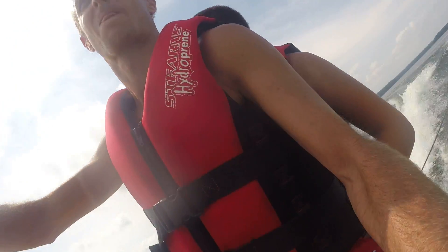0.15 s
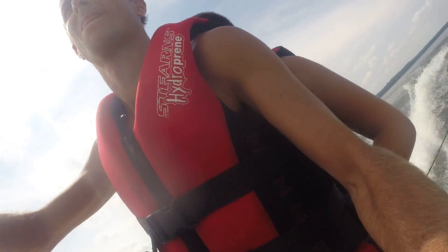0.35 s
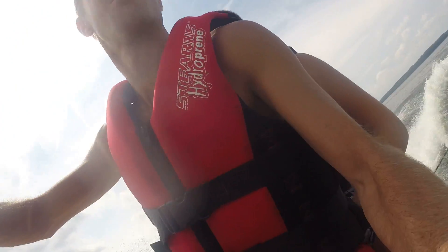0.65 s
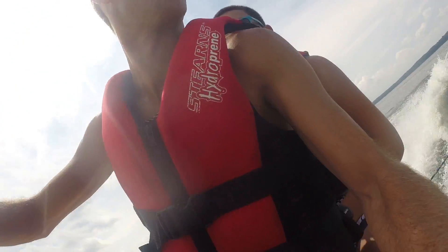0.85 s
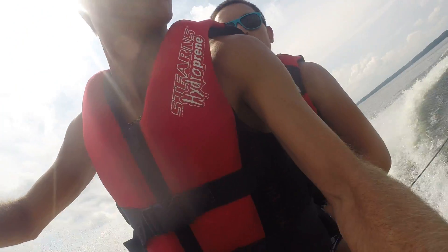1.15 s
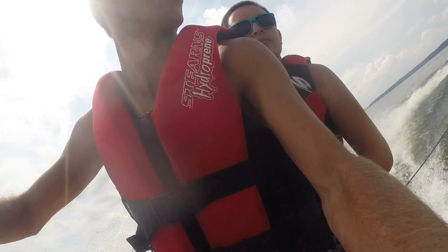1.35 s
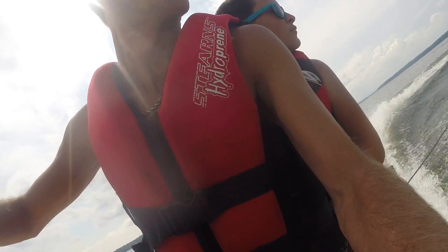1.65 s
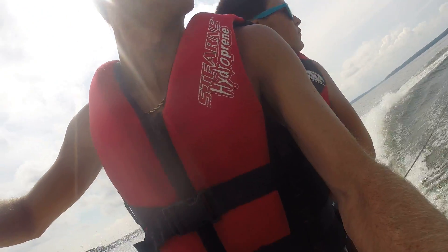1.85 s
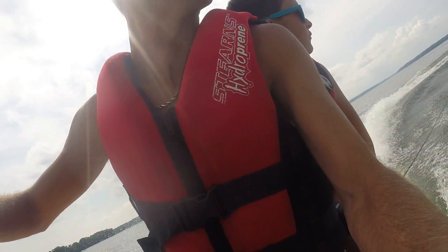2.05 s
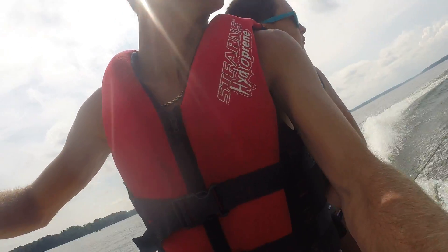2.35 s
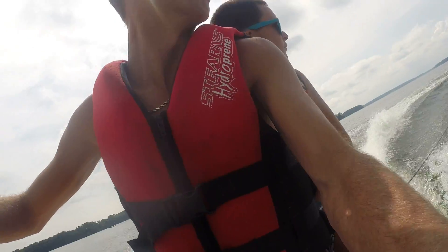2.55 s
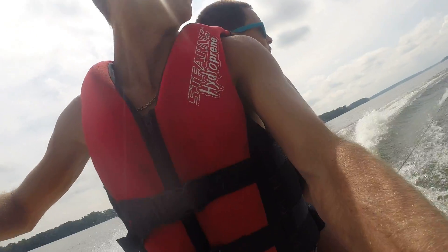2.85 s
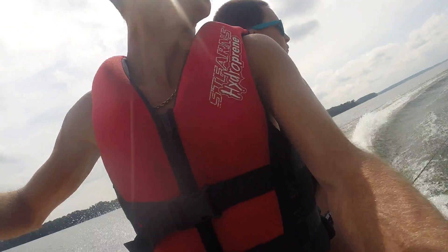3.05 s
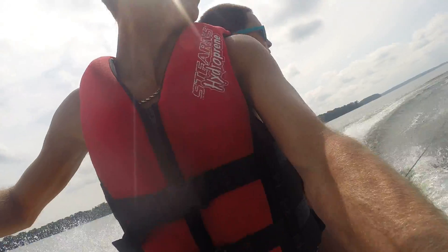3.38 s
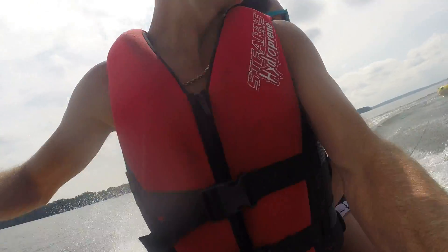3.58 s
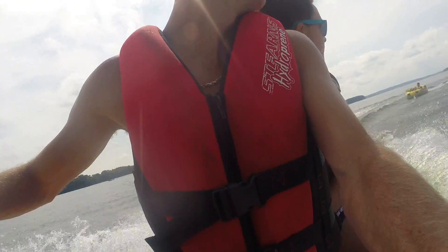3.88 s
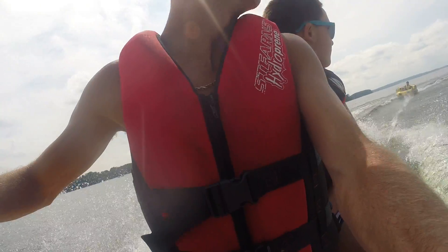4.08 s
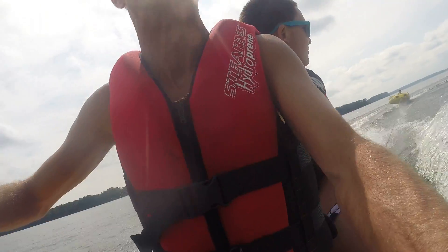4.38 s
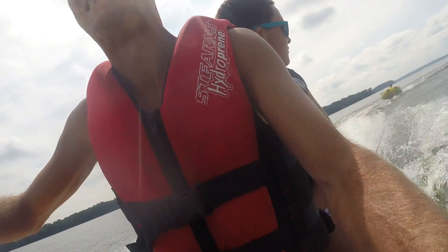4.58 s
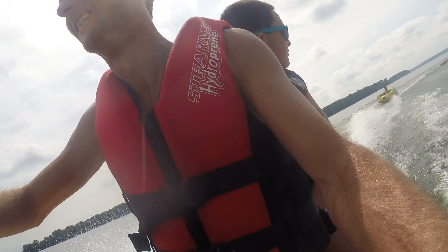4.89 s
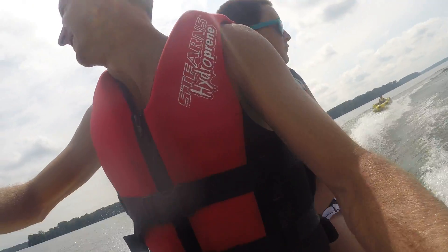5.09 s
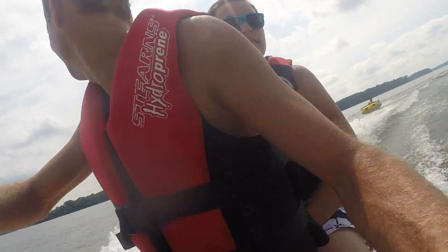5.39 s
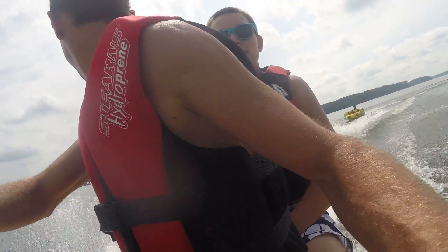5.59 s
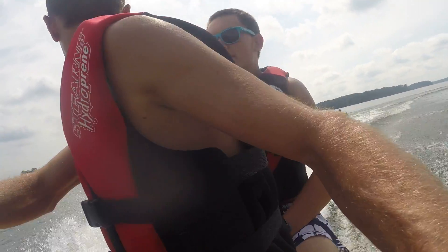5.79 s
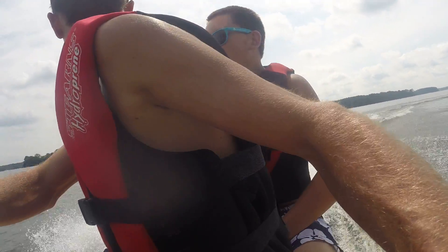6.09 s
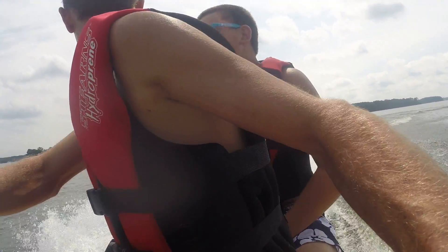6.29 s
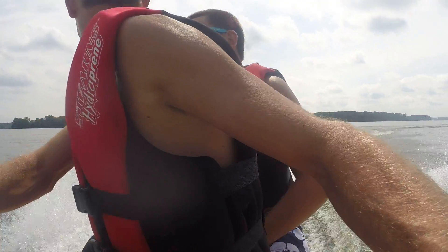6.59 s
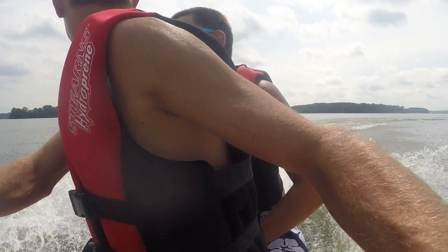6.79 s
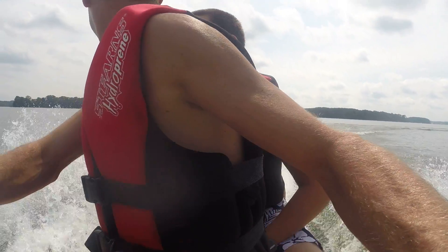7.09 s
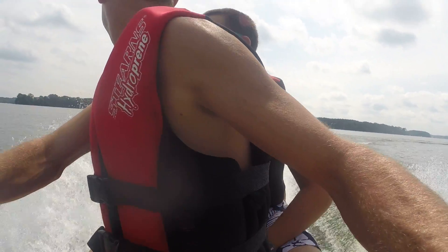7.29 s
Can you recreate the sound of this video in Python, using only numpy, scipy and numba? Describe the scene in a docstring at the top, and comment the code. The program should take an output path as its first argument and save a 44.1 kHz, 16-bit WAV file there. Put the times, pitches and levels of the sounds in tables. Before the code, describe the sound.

Muffled, boxy engine growl from a fast personal watercraft, very close and dry, with no echo. Low hum around a hundred-odd hertz carries throughout, its pitch easing up early and then settling lower. Over it come short rough bouts of hollow plastic rattling, a heavy low thump before one second, small clicks and knocks, the busiest near six and a half seconds, and very quiet hiss of spray.

```python
"""A hard case rattle over a three-cylinder engine drone: a water scooter at speed, heard inside a small
sealed case clamped to its handlebar. Firings, crankshaft and impeller hum as multiples of the engine cycle.
Pulsed noise buzzes the case's resonances, in harder bouts as the hull slams; a few blows knock the clamp.
Low resonant noise shakes the mount, and spray is faint hiss coloured by the shell."""
import sys
import numpy as np
from scipy import signal
from scipy.fft import rfft, irfft
from scipy.io import wavfile
from scipy.ndimage import uniform_filter1d
from numba import njit

SR = 44100
rng = np.random.default_rng(int(sys.argv[2]) if len(sys.argv) > 2 else 0)


def wrap_up_sound(samples):
    """Save the sound to the file named by the first command line argument, as 16-bit audio."""
    columns = np.atleast_2d(samples).T
    # keep every value between -1 and 1, then stretch to whole-number steps
    tamed = np.clip(columns, -1, 1)
    steps = np.round(tamed * 32767).astype(np.int16)
    wavfile.write(sys.argv[1], SR, steps)


N = 328104

# Table levels are starting points or balances; the functions below add their own trims and movement.
# Spray hiss, and its top end relative to the rest: time_s, hiss_db, top_db
SPRAY_CURVE = [(0.06, -55.5, -12), (0.63, -53.5, -10), (0.77, -54.5, -11.5), (2.06, -52, -11.5),
               (2.71, -52.5, -11), (2.93, -57.5, -12.5), (3.2, -53.5, -11.5), (3.61, -55, -10.5),
               (4.22, -53.5, -12.5), (5.4, -53, -10.5), (5.89, -58.5, -11), (6.32, -55, -12),
               (7.34, -53, -14), (7.38, -53, -12)]
# Tone colour of the hiss through the shell: frequency_hz, level_db
SHELL_COLOUR = [(2200, -17.5), (2400, 5), (2700, 4), (3000, 6), (3250, -3.5), (4000, 0), (4500, -1.5),
                (5200, -1.5), (5700, -5.5), (6300, 0.5), (7600, -8.5), (8300, -8), (9200, -18.5),
                (10200, -14), (13000, -22.5), (15200, -35.5)]
# Steady shaking of the mount: time_s, level_db
SHAKE_CURVE = [(0, -22.5), (2.5, -23.5), (4.5, -25.5), (7.44, -29.5)]
# Gusts and waves that jolt the mount: peak_s, peak_db
JOLTS = [(.36, -18), (.8, -9), (1.5, -20), (2.06, -18), (2.35, -14), (2.72, -21), (3.54, -16.5),
         (4.45, -23), (5.16, -16.5), (6.5, -25.5), (6.95, -22)]
JOLT_S = 0.054  # time from the peak to 1/e of a jolt's power
# Knocks of the case against its clamp: start_s, wall_blow_db, ring_relative_to_walls_db
KNOCKS = [(.373, -27, -21), (2.712, -22.5, -11), (4.449, -26, -21), (4.477, -28, -13), (5.116, -28, -19),
          (5.331, -30, -21), (6.551, -23, -5), (6.576, -19.5, -1), (6.59, -21.5, -2), (6.627, -24, -9)]
# Wall resonances a knock excites: centre_hz, width_hz, level_db
KNOCK_WALLS = [(700, 130, -2), (1260, 120, -5)]
# Thin ring a knock excites: centre_hz, width_hz, level_db
KNOCK_RING = [(1840, 150, 2.5)]
# One droplet ticking on the shell: start_s, blow_db
DROPLET = (1.7, -30)
# Broad resonance of that tick: centre_hz, width_hz, level_db
DROPLET_RING = [(4500, 3500, 1)]
# Quiet buzz of the case all along: time_s, walls_db, lid_db, ring_db
QUIET_BUZZ = [(0, -43, -33, -40), (.5, -38.5, -32.5, -41), (1.2, -35.5, -35.5, -38), (2.2, -36, -35, -38.5),
              (2.9, -40, -37.5, -43.5), (3.85, -40, -38, -41.5), (4.3, -36.5, -34.5, -36),
              (4.6, -38, -37.5, -43.5), (5.3, -38.5, -37, -43.5), (5.85, -38, -39, -45.5),
              (5.9, -40.5, -40.5, -47), (6.4, -37.5, -37.5, -43.5), (6.85, -36.5, -35, -42),
              (7.44, -33, -33, -38.5)]
# Bouts of hard rattling against the clamp as the hull slams:
# start_s, length_s, walls_db, lid_db, ring_db, extra_hum_db (before HUM_LIFT), extra_fourth_order_db
BOUTS = [(0.0, .33, -29, -39.5, -51, 3.5, 4), (0.519, 0.15, -32, -35, -38, -2.5, 4.5),
         (0.649, 0.51, -28.5, -35, -42.5, 1.5, 3), (1.646, 0.13, -30, -45, -50, 4, -1),
         (2.328, .17, -32, -44, -42, 2, 3), (2.708, 0.19, -32, -35.5, -44.5, 4.5, 9),
         (3.25, .1, -34, -39, -40.5, 1, 1), (3.44, .11, -38, -38, -49, 5.5, 0),
         (3.669, .15, -34, -38.5, -52, 10.5, 10), (4.36, .19, -28, -36, -42.5, 5, 8.5),
         (4.741, 0.069, -39, -42, -51, -1, 2), (5.079, .2, -38, -42, -48, 1, 3),
         (5.496, .37, -34.5, -38, -47.5, 4.5, 10), (6.439, .165, -33, -37.5, -44, 4, 13.5),
         (6.52, .085, -30, -35, -42, 0.5, 4), (6.626, 0.14, -34, -43.5, -47, 1.5, 8)]
BOUT_ATTACK_S, BOUT_RELEASE_S, BOUT_FLICKER_DB = 0.038, 0.02, 2
# Share of extra_hum_db taken by the first four strong multiples: firing, second_order, fifth, blades
HUM_LIFT = (0.074, 0.83, 0.86, 0.068)
# Low wall resonances of the case: centre_hz, width_hz, level_db
WALL_MODES = [(307.3, 61, 10), (500, 280, -6), (678, 88, 2)]
# Lid resonances: centre_hz, width_hz, level_db
LID_MODES = [(897.5, 107, 1), (1068, 138, -1), (1238, 147, -2.5), (1510, 350, -12.5)]
# Thin ring resonances: centre_hz, width_hz, level_db
RING_MODES = [(1845, 73, 0.5), (1752, 100, -5.5), (1990, 120, -5.5), (2203, 140, -8.5)]
# Rattle that repeats each cycle: cycle_multiple, level_relative_to_walls_db
REPEATING_RATTLE = [(11, -17.5), (12, -11.5), (13, -13), (14, -14), (15, -13.5), (16, -13.5), (17, -10.5),
                    (18, -11.5), (19, -18)]
REPEAT_GROWTH = 0.15  # extra dB of repeating rattle per dB the walls' buzz rises over its mean
# Engine hum through the mount between bouts; one cycle is two shaft turns:
# time_s, cycle_hz, firing_db, second_shaft_order_db, fifth_multiple_db, impeller_blades_db, fourth_shaft_order_db
HUM_CURVE = [(0, 39.9, -15, -26.5, -23, -18, -29), (.41, 38.29, -18.5, -25, -22, -19.5, -33),
             (.7, 39.56, -14.5, -27, -20.5, -17.5, -28.5), (.83, 40.1, -12.5, -26.5, -35.5, -21, -35),
             (1.1, 40.8, -12, -27.5, -36, -22, -33.5), (1.25, 40.97, -15, -21, -36, -17.5, -26),
             (1.7, 41.25, -17, -21, -32.5, -17.5, -30.5), (2.0, 41.38, -16.5, -15.5, -36, -16.5, -29),
             (2.26, 38.84, -18.5, -32, -28, -16.5, -26), (2.45, 38.22, -18, -17, -17, -18, -32.5),
             (2.68, 38.02, -13.5, -19, -22.5, -18.5, -30), (2.86, 38.3, -15.5, -19, -21, -20, -33),
             (3.02, 38.64, -21, -25.5, -26, -19, -41), (3.3, 38.47, -19, -22, -19.5, -16.5, -31),
             (3.45, 38.46, -14.5, -22, -26.5, -15.5, -39), (3.67, 38.75, -28, -28.5, -22, -20.5, -35.5),
             (4.0, 39.35, -17.5, -27, -24, -18.5, -28.5), (4.37, 38.78, -14.5, -20, -20, -15.5, -30.5),
             (4.75, 37.43, -16, -18.5, -21, -19, -37), (5.3, 36.88, -21.5, -15, -19, -19, -36),
             (5.45, 37.06, -17, -16, -20, -21, -37), (5.84, 37.8, -26.5, -18, -22, -20, -33.5),
             (5.97, 38.05, -22, -17, -22, -18.5, -42.5), (6.44, 38.03, -19.5, -17.5, -22, -16.5, -38.5),
             (6.8, 38.4, -17.5, -19, -22, -16, -35), (7.2, 39, -27.5, -19, -22, -16, -30),
             (7.44, 38.26, -24, -16.5, -17, -17.5, -37)]
# Cycle multiples of those five levels, in order: cycle_multiple
HUM_MULTIPLES = (3, 4, 5, 6, 8)
# Depth of each one's stray around its level: wander_db
HUM_WANDER_DB = (0.96, 1.3, 2, 0.35, 2.2)
# Weak engine multiples: cycle_multiple, level_db
WEAK_HUM = [(1, -36), (2, -35), (7, -40), (10, -44.5)]
THIRD_DB, THIRD_FOLLOWS = -35.5, 0.45  # third firing multiple; its share of the walls' dB swings
TOP_HZ = 15100  # upper edge of the finished sound


def undb(db):
    """Turn decibels into linear gain."""
    return 10 ** (np.asarray(db) / 20)


def level(x, db):
    """Scale a signal to an rms level in dB."""
    return x * undb(db) / np.sqrt(np.mean(x ** 2))


def columns(table):
    """Draw straight lines through each column of a timed table, sample by sample."""
    time_s, *values = np.transpose(table)
    t = np.arange(N) / SR
    return [np.interp(t, time_s, value) for value in values]


def walk(rate_hz):
    """Drift at random: levels held 1 / rate_hz seconds and smoothed twice; spread near 1."""
    hold = int(SR / rate_hz)
    steps = np.repeat(rng.standard_normal(N // hold + 1), hold)
    smooth = uniform_filter1d(uniform_filter1d(steps, hold), hold)
    return 1.18 * smooth[:N]


@njit
def bandpass(x, hz, width_hz):
    """Resonate as a state-variable band-pass with gain 1 at its centre."""
    y, band, low = np.empty(len(x)), 0., 0.
    g, damping = np.tan(np.pi * hz / SR), width_hz / hz
    for i in range(len(x)):
        v = (band + g * (x[i] - low)) / (1 + g * (g + damping))
        band = 2 * v - band
        low = low + 2 * g * v
        y[i] = damping * v
    return y


def resonate(x, hz, width_hz):
    """Pass a signal twice through one resonance for steeper skirts."""
    hz, width_hz = float(hz), float(width_hz)
    return bandpass(bandpass(x, hz, width_hz), hz, width_hz)


def body(drive, modes):
    """Shake each resonance with its own noise under a common drive, evened out for total width."""
    total, power_width = 0, 0
    for hz, width_hz, db in modes:
        noise = drive * rng.standard_normal(N)
        total = total + undb(db) * resonate(noise, hz, 1.5 * width_hz)  # two passes narrow the band
        power_width += undb(db) ** 2 * width_hz
    return total / np.sqrt(power_width * np.pi / SR)


def tone(cycle, multiple, db, slip_rad, flutter_db):
    """Sound one multiple of the cycle; its phase slips and its level flutters as strokes differ."""
    spread = -0.4 * multiple ** 2  # bending waves in the hull smear each stroke in time
    phase = multiple * cycle + spread + slip_rad * walk(30) + 0.5 * walk(1.694)
    return np.sqrt(2) * undb(db + flutter_db * walk(25)) * np.cos(phase)


def spray(shake):
    """Hiss coloured by the shell; it throbs with the mount and with sheets of droplets, the top most."""
    hiss_db, top_db = columns(SPRAY_CURVE)
    hz = np.fft.rfftfreq(N, 1 / SR)
    shell_hz, shell_db = np.transpose(SHELL_COLOUR)
    colour = undb(np.interp(np.log(hz + 1), np.log(shell_hz), shell_db, left=-120))
    noise = rfft(rng.standard_normal(N)) * colour
    top_share = np.clip(hz / 1000 - 7.5, 0, 1)  # crossfade from 7.5 to 8.5 kHz
    low = level(irfft(noise * (1 - top_share), N), 2.98)
    high = level(irfft(noise * top_share, N), 0.14)
    throb = shake + 0.7 * walk(40)
    return undb(hiss_db) * (low * undb(0.82 * throb) + high * undb(top_db + 1.3 * throb))


def mount():
    """Wind and chop shake the mount at its lowest resonances, here as noise of near-unit size."""
    return level(body(1., [(26.0, 14, 10), (37.4, 15, -4.5)]), -1.9)


def shaking():
    """Set the gain of the mount's motion: steady shaking plus the power of bell-shaped jolts."""
    t = np.arange(N) / SR
    power = undb(columns(SHAKE_CURVE)[0]) ** 2
    for peak_s, db in JOLTS:
        power = power + undb(db) ** 2 * np.exp(-((t - peak_s) / JOLT_S) ** 2)
    return np.sqrt(power)


def strike(start_s, blow_db, modes):
    """Ring resonances with soft blows: impulses swelling and dying through two band-passes."""
    blows = np.zeros(N)
    blows[(np.asarray(start_s) * SR).astype(int)] = undb(blow_db)
    total = 0
    for hz, width_hz, db in modes:
        to_unit_peak = np.e * SR / (2 * np.pi * width_hz)  # undoes the filters' peak loss
        total = total + undb(db) * resonate(blows, hz, width_hz) * to_unit_peak
    return total


def knocks():
    """Each blow rings the walls and the thin ring for a few milliseconds; one droplet ticks."""
    start_s, wall_db, ring_db = np.transpose(KNOCKS)
    walls = strike(start_s, wall_db, KNOCK_WALLS)
    ring = strike(start_s, wall_db + ring_db, KNOCK_RING)
    return walls + ring + strike(*DROPLET, DROPLET_RING)


def buzz():
    """Set wall, lid and ring levels and extra hum: quiet buzz plus bouts that swell, hold and stop short."""
    t = np.arange(N) / SR
    power = undb(np.array(columns(QUIET_BUZZ))) ** 2
    extra_db = 0
    flicker = undb(BOUT_FLICKER_DB * walk(25)) ** 2
    for start_s, length_s, *part_db, hum_db, fourth_db in BOUTS:
        attack = (t - start_s) / BOUT_ATTACK_S
        release = (start_s + length_s - t) / BOUT_RELEASE_S
        shape = np.clip(np.minimum(attack, release), 0, 1)
        power = power + np.outer(undb(part_db) ** 2, shape ** 2 * flicker)
        lift_db = [*np.multiply(HUM_LIFT, hum_db), fourth_db]
        extra_db = extra_db + np.outer(lift_db, shape)
    wall_db, lid_db, ring_db = 10 * np.log10(power)
    return wall_db, lid_db, ring_db, extra_db


def case(cycle, wall_db, lid_db, ring_db):
    """Noise pulsed by cycles, shaft turns and firings rings the case; part of the rattle repeats."""
    beat = 0.11 * np.cos(cycle) + 0.17 * np.cos(2 * cycle + 0.25) + 0.22 * np.cos(3 * cycle + 2.96)
    repeat_db = wall_db + REPEAT_GROWTH * (wall_db - wall_db.mean()) - 1.5
    repeats = sum(tone(cycle, multiple, repeat_db + db + 2.5 * walk(4.5), 0.4, 0.9)
                  for multiple, db in REPEATING_RATTLE)
    walls = body(np.exp(beat) * undb(wall_db + 2.5), WALL_MODES)
    lid = body(np.exp(beat) * undb(lid_db + 0.37), LID_MODES)
    ring = body(np.exp(1.3 * beat) * undb(ring_db - 0.5 + 1.0 * walk(70)), RING_MODES)
    return repeats + walls + lid + ring


def engine(cycle, wall_db, extra_db):
    """Hum in strong multiples and wandering weak ones, with uneven burning as noise between them."""
    wander_db = [depth_db * walk(12) for depth_db in HUM_WANDER_DB]
    strong_db = columns(HUM_CURVE)[1:] + extra_db + wander_db
    strong = sum(tone(cycle, multiple, db, 0.17, 1.0)
                 for multiple, db in zip(HUM_MULTIPLES, strong_db))
    weak = sum(tone(cycle, multiple, db + 1.8 * walk(3.8), 0.75, 2.8) for multiple, db in WEAK_HUM)
    third_db = THIRD_DB + THIRD_FOLLOWS * (wall_db - wall_db.mean())
    third = tone(cycle, 9., third_db + 1.9 * walk(5.4), 0.64, 2.6)
    beside_third = tone(cycle, 8.4, third_db - 7.0, 0.36, 2.7)
    uneven_burning = body(undb(-24.0), [(166.8, 50.0, 5.5), (88, 19, -2.0)])
    return strong + weak + third + beside_third + uneven_burning


def scene():
    """Mix everything that reaches the one microphone through the case."""
    cycle = 2 * np.pi * np.cumsum(columns(HUM_CURVE)[0]) / SR  # phase in radians
    shake = mount()
    wall_db, lid_db, ring_db, extra_db = buzz()
    background = spray(shake) + shaking() * shake + knocks()
    rattle = case(cycle, wall_db, lid_db, ring_db)
    motor = engine(cycle, wall_db, extra_db)
    return (background + rattle + motor)[None]


def record(dry):
    """Round the loudest peaks at the microphone, then cut the top steeply."""
    top_cut = signal.ellip(12, 0.2, 70, TOP_HZ, fs=SR, output="sos")
    rounded = np.tanh(0.88 * dry) / 0.86
    return signal.sosfilt(top_cut, rounded)


dry = scene()
out = record(dry)
wrap_up_sound(out)
```